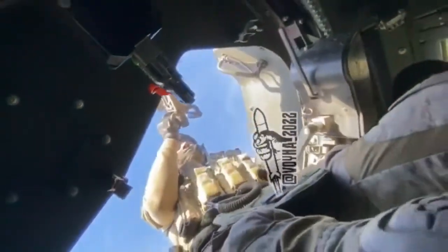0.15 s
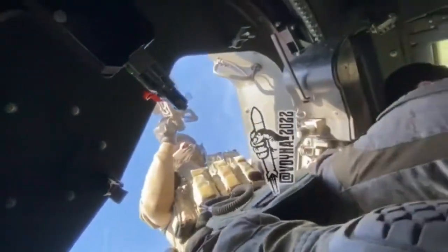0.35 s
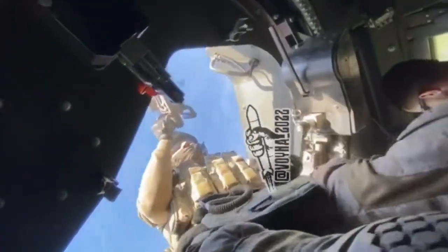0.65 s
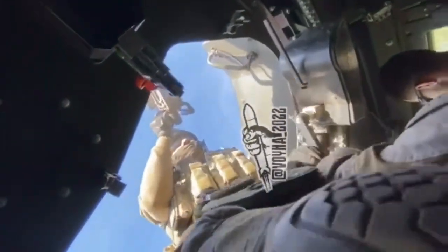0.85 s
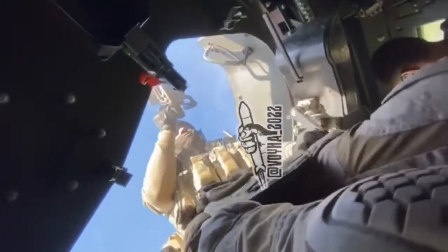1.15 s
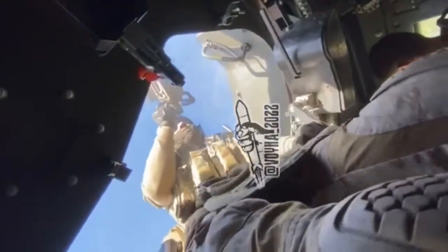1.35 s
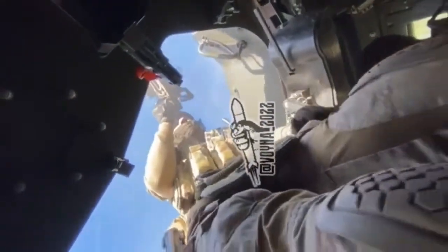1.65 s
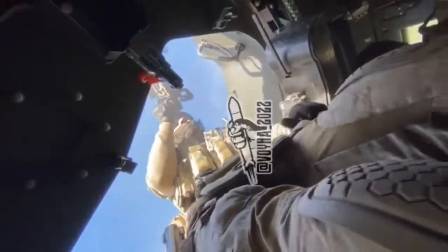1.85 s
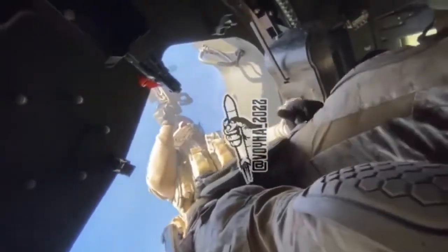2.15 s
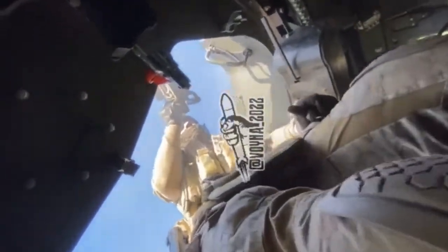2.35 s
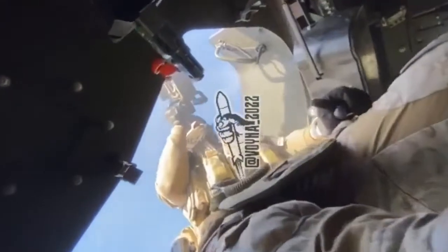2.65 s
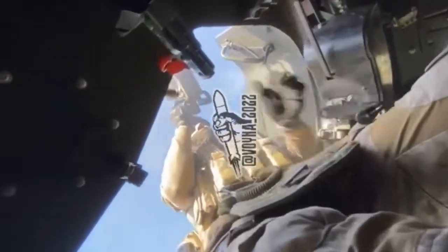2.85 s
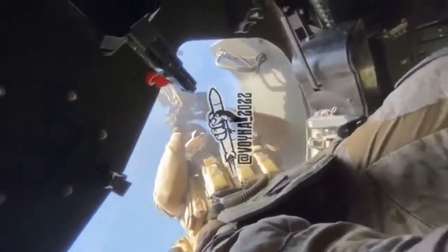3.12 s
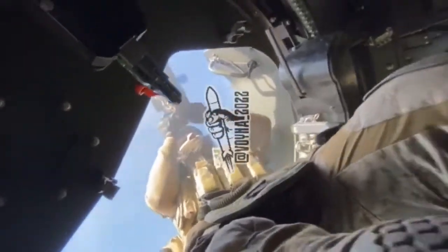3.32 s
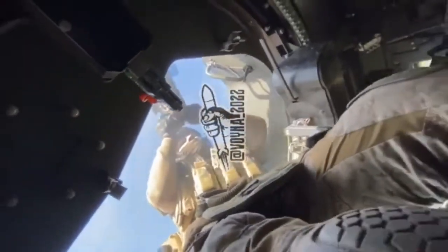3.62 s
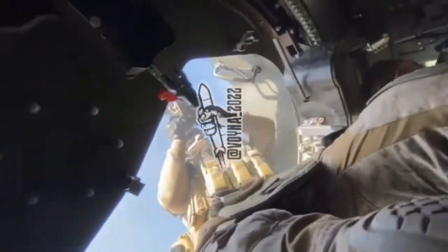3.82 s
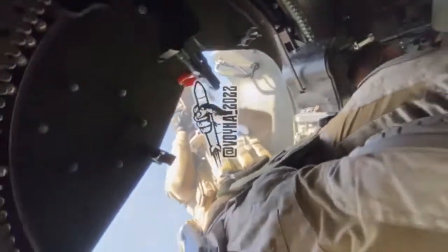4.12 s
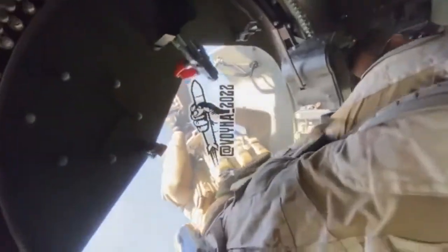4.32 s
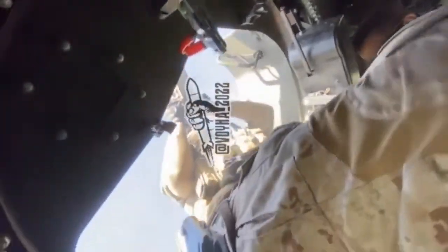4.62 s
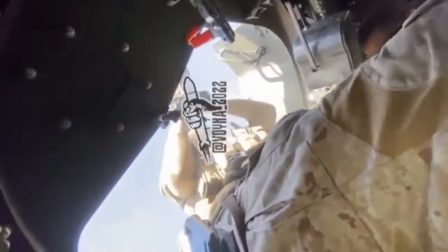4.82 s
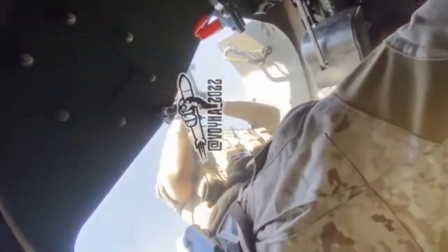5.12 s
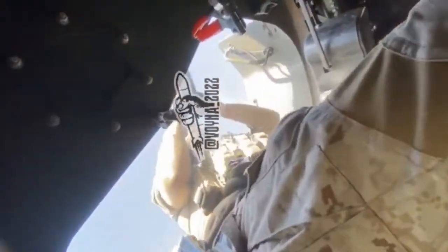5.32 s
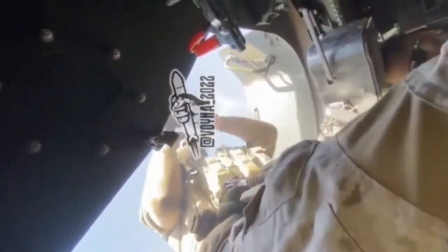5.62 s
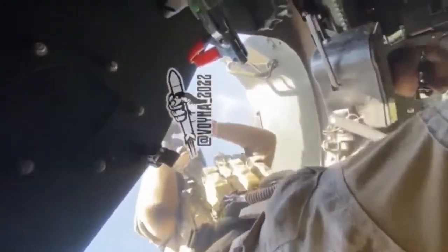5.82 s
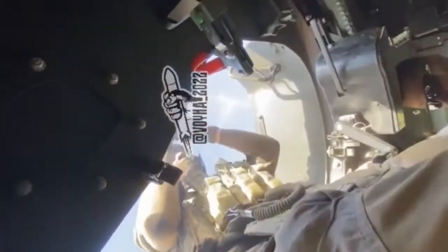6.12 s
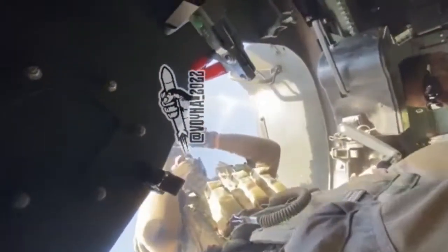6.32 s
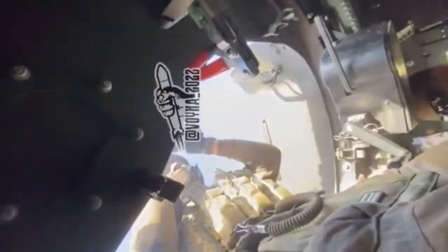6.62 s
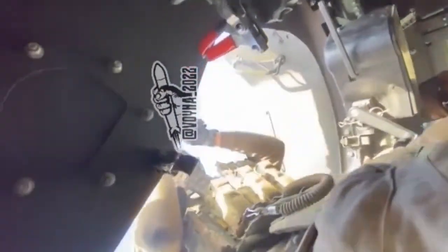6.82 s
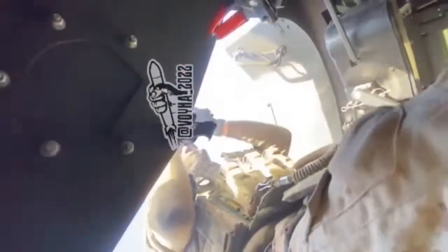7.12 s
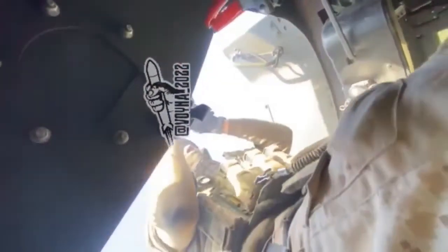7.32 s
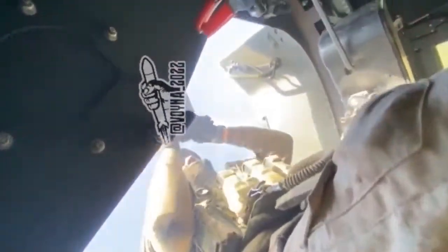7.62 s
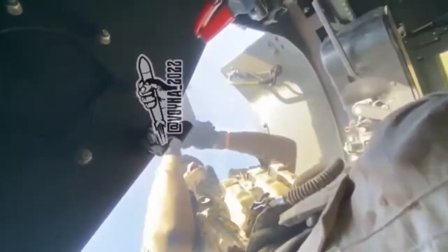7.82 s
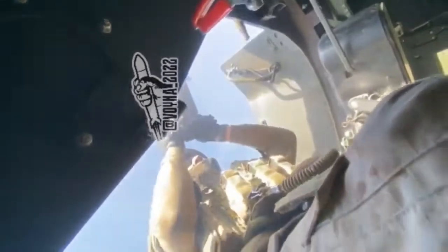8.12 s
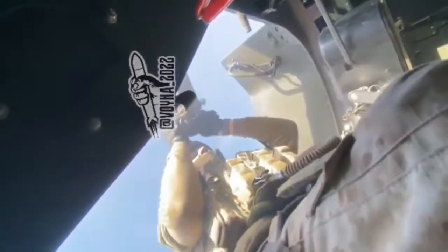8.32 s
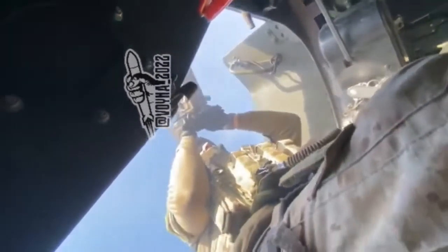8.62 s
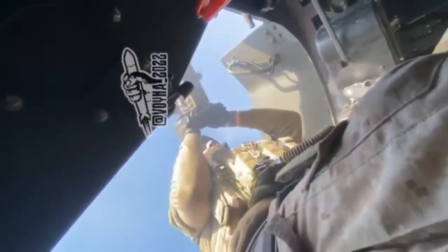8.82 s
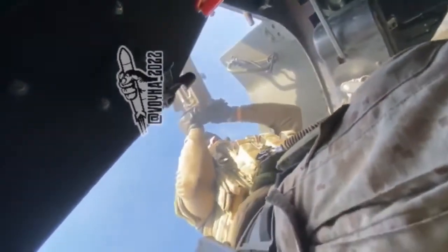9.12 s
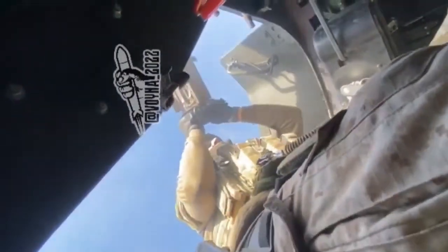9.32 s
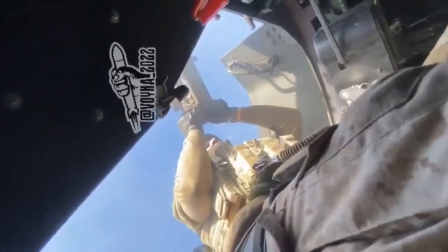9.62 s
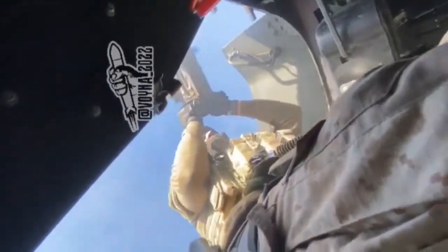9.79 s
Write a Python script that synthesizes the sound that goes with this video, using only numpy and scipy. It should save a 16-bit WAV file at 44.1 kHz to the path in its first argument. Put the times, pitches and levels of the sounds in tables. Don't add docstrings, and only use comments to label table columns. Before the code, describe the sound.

Inside a rumbling armoured vehicle, a heavy machine gun overhead fires one unbroken ten-second burst, each shot booming through the hull while cases tinkle.

```python
import sys
import numpy as np
from scipy import signal
from scipy.fft import rfft, irfft, next_fast_len
from scipy.io import wavfile
from scipy.ndimage import uniform_filter1d

SR = 44100
rng = np.random.default_rng(int(sys.argv[2]) if len(sys.argv) > 2 else 0)


def materialize(psi):
    bounded = np.clip(np.atleast_2d(psi).T, -1, 1)
    quanta = np.round(bounded * 32767).astype(np.int16)
    wavfile.write(sys.argv[1], SR, quanta)


def field_ratio(decibels):
    return 10 ** (np.asarray(decibels, dtype=float) / 20)


N = 438794


def colour(x, points):
    hz, db = np.transpose(points)
    size = next_fast_len(x.shape[-1])
    f = np.maximum(np.arange(size // 2 + 1) * SR / size, 1)
    gain = field_ratio(np.interp(np.log(f), np.log(hz), db))
    return irfft(rfft(x, size) * gain, size)[..., :x.shape[-1]]


def level(x, db):
    return x * field_ratio(db) / np.sqrt(np.mean(x ** 2))


def decay(t, t60):
    return np.exp(-np.log(1000) * t / t60)


def walk(rate):
    k = int(SR / rate)
    held = np.repeat(rng.standard_normal(N // k + 1), k)
    return 1.18 * uniform_filter1d(held, k)[:N]


def clumps(shape, seconds, spread_db):
    k = max(int(seconds * SR), 2)
    draws = rng.standard_normal(shape[:-1] + (shape[-1] // 40,))
    steps = np.repeat(draws, k, axis=-1)[..., :shape[-1]]
    return field_ratio(spread_db * uniform_filter1d(steps, k, axis=-1))


def drift(count, shape, hold):
    frozen = rng.standard_normal((8,) + shape)
    progress = np.linspace(0, 7, count)[:, None]
    near = np.exp(-.5 * ((progress - np.arange(8)) / hold) ** 2)
    near /= np.linalg.norm(near, axis=1, keepdims=True)
    return np.tensordot(near, frozen, 1)


def place(sounds, times):
    size = sounds.shape[-1]
    out = np.zeros((2, N + 2 * size))
    for sound, i in zip(sounds, np.round(times * SR).astype(int) + size):
        out[:, i:i + size] += sound
    return out[:, size:size + N]


# f/Hz, level/dB
CABIN_MID = [(15, -45.5), (25, -6), (193, -1.5), (311, -11), (454, -7), (542, -16.5), (1180, -22),
             (1820, -31), (4290, -33.5), (5380, -43.5), (8680, -42), (9610, -57), (10400, -82.5),
             (13500, -115), (22000, -120)]
CABIN_SIDE = [(15, -40), (25, -12.5), (166, -6), (296, -10), (371, -6.5), (663, 1), (1340, -10),
              (3590, -17), (5240, -14), (9610, -26), (10400, -33), (11500, -60), (15500, -68),
              (22000, -120)]


def cabin():
    noise = rng.standard_normal((2, N))
    mid = level(colour(noise[0], CABIN_MID), -37)
    side = level(colour(noise[1], CABIN_SIDE), -47.5)
    base = np.array([mid, side])
    out = np.zeros((2, N))
    for hz in 40 * 2. ** np.arange(9):
        octave = [(hz / 2.8, -60), (hz / np.sqrt(2), -3), (hz, 0), (hz * np.sqrt(2), -3), (hz * 2.8, -60)]
        out += colour(base, octave) * field_ratio(2.5 * walk(12))
    return out


# f/Hz, level/dB, t60/s
BRASS = [(5030, -8, .1), (6520, -0.5, 0.18), (6240, -3.5, .09), (8850, -9.5, .08), (9650, -11.5, 0.18)]
# t/s, peak level/dB, ring level/dB
CASES = [(0.0694, -29, -46), (0.9343, -21, -63), (1.263, -33.5, -72), (1.7654, -25, -57),
         (1.8394, -29.5, -59), (3.3894, -24, -37), (3.4775, -29.5, -47), (3.5573, -22, -58.5),
         (3.7494, -34, -62.5), (3.9589, -18, -45.5), (4.9694, -38, -57), (5.2994, -34, -50),
         (6.1285, -33, -62), (6.5094, -26.5, -51), (6.8594, -32, -66.5), (7.212, -30, -56),
         (8.1494, -28.5, -47.5), (8.5594, -37.5, -58)]


def brass():
    s, knock_db, ring_db = np.transpose(CASES)
    hit = (s * SR).astype(int)
    knocks, strikes = np.zeros((2, N))
    knocks[hit] = field_ratio(knock_db)
    strikes[hit] = field_ratio(ring_db + 6)
    t = np.arange(SR // 3) / SR
    rings = np.zeros(N)
    for hz, db, t60 in BRASS:
        struck = rng.random(N) < 60 / SR
        tinkle = struck * field_ratio(-63.5 + 3.5 * rng.exponential(size=N))
        onset = np.minimum(t / 0.0027, 1)
        ring = field_ratio(db) * np.sin(2 * np.pi * hz * t) * decay(t, t60) * onset
        rings += signal.fftconvolve(strikes + tinkle, ring)[:N]
    thud = [(300, -14), (900, -0.5), (4000, -2), (5500, -11), (9000, -22), (11000, -60)]
    knock = colour(rng.standard_normal((2, len(t))), thud) * decay(t, .06)
    hull = signal.fftconvolve(knocks[None], knock, axes=1)[:, :N]
    return rings * np.array([[.5], [1]]) + 0.76 * hull


# t/s, spread/s, level/dB
BOLT = [
    (0.05, 0.015, -40),
    (-0.046, 0.015, -45.5),
    (-0.013, 0.015, -45.5),
]


def bolt(times, slam_db):
    t = np.arange(-2000, 2000) / SR
    effort = np.zeros((2, N))
    for offset, spread, db in BOLT:
        chance = rng.standard_normal((len(times), 2))
        change_db = slam_db[:, None] if offset > 0 else 2.5 * chance[:, :1]
        strokes = field_ratio(db + change_db) * np.exp(-.5 * (t / spread) ** 2)
        jitter = 0.0036 * chance[:, 1]
        effort += place(strokes, times + offset + t[0] + jitter)
    ticks = rng.standard_normal((2, N)) * field_ratio(1.6 * rng.exponential(size=N))
    ticks *= clumps((N,), .012, spread_db=3.2)
    steel_mid = [(300, -12), (1000, -3), (2800, -1), (4400, -4.5), (5300, -16), (9000, -19.5),
                 (10500, -52), (11500, -80)]
    steel_side = [(300, -9), (1000, -4), (2800, 0.5), (5200, -5), (9500, -17), (10500, -24),
                  (11500, -48), (16000, -55)]
    mid = level(colour(ticks[0], steel_mid), 0)
    side = level(colour(ticks[1], steel_side), 1.5)
    return effort * np.array([mid, side])


def echo(t, run_up_db, rise, hold, fall, tail_db, tail_fall):
    late = np.maximum(t - hold, 0)
    run_up = field_ratio(run_up_db + rise * np.minimum(t, 0))
    fading = np.hypot(field_ratio(-fall * late), field_ratio(tail_db - tail_fall * late))
    return np.where(t < 0, run_up, fading)


# f/Hz, level/dB
BLAST_MID = [(190, -29), (330, -3.5), (932, -14), (1230, -13.5), (1420, -17.5), (2310, -20), (3620, -22.5),
             (6160, -35), (7990, -39.5), (8710, -38.5), (10400, -53), (11500, -74), (15500, -84),
             (22000, -120)]
BLAST_SIDE = [(120, -36), (200, -17.5), (557, 0.5), (1250, -6), (1430, -9), (2630, -11), (3540, -18),
              (5620, -16), (7320, -26.5), (8640, -27), (10400, -34), (11500, -50), (15500, -56),
              (22000, -120)]
# run-up level/dB, rise/(dB/s), hold t/s, first fall/(dB/s),
# tail level/dB, tail fall/(dB/s)
BODY_ECHO = (-9, 4400, .013, 1000, -16, 250)
CRACK_ECHO = (-5, 2400, .011, 800, -14, 270)


def blast(db, crack_db, t):
    low = signal.butter(2, 2000, fs=SR, output="sos")
    high = signal.butter(2, 2000, "high", fs=SR, output="sos")
    shape = (2, len(t))
    repeat = 0.74 * drift(len(db), shape, hold=0.93) + .5 * rng.standard_normal((len(db),) + shape)
    body = signal.sosfilt(low, repeat) * echo(t, *BODY_ECHO)
    crack = signal.sosfilt(high, rng.standard_normal(repeat.shape)) * echo(t, *CRACK_ECHO)
    crack *= clumps(crack.shape, .003, spread_db=2.0)
    noise = field_ratio(db)[:, None, None] * body + field_ratio(crack_db)[:, None, None] * crack
    mid = level(colour(noise[:, 0], BLAST_MID), -28)
    side = level(colour(noise[:, 1], BLAST_SIDE), -28)
    return np.stack([mid, side], axis=1)


# t/s, f/Hz, level/dB
BOOM = [(0, 299, -35.5), (.002, 254, -15), (.004, 232, -6.5), (.011, 214, -10.5), (.016, 151, -6),
        (.021, 146, -5.5), (.025, 171.4, -17.5), (.034, 147.3, -22.5), (.05, 150, -34.5)]


def boom(db, t):
    s, hz, shape_db = np.transpose(BOOM)
    stretch = 1 + 0.011 * rng.standard_normal((len(db), 1))
    phase = 2 * np.pi * np.cumsum(np.interp(t, s, hz, left=0)) / SR * stretch + 0.33
    sounding = (t > 0) & (t < s[-1])
    wave = field_ratio(db[:, None] + np.interp(t, s, shape_db)) * np.sin(phase) * sounding
    return wave[:, None] * np.array([[1], [.08]])


# f/Hz, level/dB, arrival t/s, swell/s, t60/s, side share/0-1
PANELS = [(54.1, -26, 0.032, 0.026, .15, .25), (73, -22, .0055, .022, .1, .2),
          (92, -15.5, 0.00033, .02, 0.075, .2), (185, -22.5, 0.0197, .006, .16, 0.16),
          (279.5, -21.5, 0.001, 0.005, 0.11, 0.4), (355, -20.5, 0.00088, .005, .07, .4),
          (398.7, -30, .033, 0.0089, .17, 0.32), (458, -16, 0.00098, .004, .06, 0.42),
          (520, -38, .03, 0.00998, 0.17, .6), (663, -23.5, 0.00049, .003, .06, .8),
          (785.5, -22, .0002, .002, 0.056, .8), (990, -26, 0.00011, 0.00083, .04, 0.7),
          (1193, -23, .0001, 0.0011, .045, 0.86), (1515, -24.5, .0001, 0.0011, .04, 0.87)]


def panels(db, t):
    hz, mode_db, arrival, swell, t60, side = np.transpose(PANELS)
    age = np.maximum(t - arrival[:, None], 0)
    fade = (1 - np.exp(-age / swell[:, None])) * decay(age, t60[:, None])
    ring = fade / fade.max(axis=1, keepdims=True) * np.exp(2j * np.pi * hz[:, None] * age)
    shape = (2, 2, len(hz))
    scatter = rng.standard_normal((len(db),) + shape)
    turn = side * (1.06 * drift(len(db), shape[1:], hold=0.58) + 0.39 * scatter[:, 0])
    share = np.array([np.ones_like(side), side])
    strength = share * np.exp(1j * turn) * field_ratio(mode_db + 3.66 * side * scatter[:, 1])
    strength[:, 1] *= np.exp(2j * np.pi * rng.random(len(hz)))
    return field_ratio(db)[:, None, None] * np.imag(strength @ ring)


# f/Hz, level at rest/dB, slope across/(dB/m), slope away/(dB/m)
STANDING = [(95, -3.2, 0, -4), (310, 2.8, 14, 5), (360, 2, 12, 6), (440, 3, 3, 10), (650, 1, 20, 0),
            (780, .5, 0, -24)]


def posed(shots, across, away):
    hz, rest_db, per_across, per_away = np.transpose(STANDING)
    plain = [(170, 0), (230, 0), (540, 0), (950, 0)]
    rows = rest_db + np.outer(across, per_across) + np.outer(away, per_away)
    out = []
    for shot, db in zip(shots, rows):
        bass = (55, -3 - db[0])
        out.append(colour(shot, sorted(plain + [bass] + list(zip(hz, db)))))
    return np.array(out)


# f/Hz, left minus right level/dB
SHADE = [(60, -1), (110, 1), (190, 0), (330, 2), (580, -2), (1020, -7), (1810, -2.5), (3190, -0.5),
         (5620, 0.0), (9910, 2.5)]


def ports(mid, side):
    half = np.array(SHADE) * [1, .5]
    return np.array([colour(mid + side, half), colour(mid - side, half * [1, -1])])


# t/s, boom level/dB
BELT = [(.038, 1.5), (.199, 2.5), (.3594, .5), (.5232, 1.5), (.6726, 2), (.8374, -1), (.994, 1.5),
        (1.1522, 0), (1.3119, .5), (1.4669, -1.5), (1.6327, .5), (1.7931, -1.5), (1.945, 0),
        (2.1185, 1), (2.272, -1.5), (2.429, 0), (2.5837, .5), (2.735, 2), (2.898, 1), (3.0529, 0),
        (3.21, -1.5),
        (3.3612, .5), (3.516, -.5), (3.6741, -1), (3.83, 0), (3.9865, 1), (4.143, -1), (4.2978, 2),
               (4.4607, -2.5), (4.6194, -2), (4.7752, 1.5), (4.9357, 2), (5.0941, .5), (5.2565, .5),
               (5.4053, 1), (5.5616, -1), (5.7187, .5), (5.8701, 0), (6.0335, -2.5), (6.1808, .5),
               (6.3327, -.5), (6.486, -.5),
        (6.6392, -.5), (6.7934, -.5), (6.9428, -.5), (7.1002, -1), (7.2558, 0), (7.41, .5), (7.5648, 0),
            (7.7166, -.5), (7.872, -1), (8.0227, .5), (8.1751, -2), (8.3319, 0), (8.4841, 1.5), (8.6354, 2),
            (8.7881, 1.5), (8.943, .5), (9.1018, 0), (9.2524, -.5), (9.4042, 1), (9.5546, 0), (9.7084, 1.5),
            (9.8604, 1.5)]
# t/s, across/m, away from the hatch/m
POSE = [(0, .1, -.3), (1.3, 0, -.17), (2.4, -.1, -.17), (3.5, -.2, -.2), (4.6, -.07, 0), (5.7, .07, .05),
        (6.8, .15, -.03), (7.9, .13, .2), (8.9, -.03, .17), (9.95, -.1, .13)]


def scene():
    s, boom_db = np.transpose(BELT)
    moment, *spot = np.transpose(POSE)
    across, away = (np.interp(s, moment, v) for v in spot)
    body_db = -.15 * boom_db
    crack_db = .3 * boom_db - 4 * away + .7 * rng.standard_normal(len(s))
    bolt_db = .35 * (s - s.mean()) + 2.5 * rng.standard_normal(len(s))
    lead = .03
    t = np.arange(SR // 4) / SR - lead
    shots = blast(body_db, crack_db, t) + boom(boom_db, t) + panels(body_db, t)
    burst = place(posed(shots, across, away), s - lead)
    mid, side = cabin() + brass() + bolt(s, bolt_db) + burst
    return ports(mid, side)


def gate(mid, side, from_hz, under_db, top_hz, top_db):
    hz, _, (m, d) = signal.stft(np.array([mid, side]), SR, nperseg=2048)

    def spread(bands):
        return np.repeat(bands, 16, axis=0)[:len(hz)]

    starts = np.arange(0, len(hz), 16)
    mid_power, side_power = (spread(np.add.reduceat(np.abs(v) ** 2, starts, axis=0)) for v in (m, d))
    scatter_db = spread(5.0 * rng.standard_normal((len(hz) // 16 + 1, m.shape[1])))
    threshold_db = under_db + scatter_db + top_db * (hz[:, None] > top_hz)
    weak = (mid_power < side_power * field_ratio(2 * threshold_db)) & (hz[:, None] > from_hz)
    return signal.istft(m * ~weak, SR, nperseg=2048)[1][:N]


def low_pass(x):
    return signal.sosfilt(signal.butter(12, 15800, fs=SR, output="sos"), x)


def record(dry):
    left, right = 1.04 * np.tanh(1.041 * dry)
    mid, side = (left + right) / 2, (left - right) / 2
    mid = gate(mid, side, from_hz=4800, under_db=-11.0, top_hz=10300, top_db=12.0)
    return low_pass(np.array([mid + side, mid - side]))


dry = scene()
out = record(dry)
materialize(out)
```